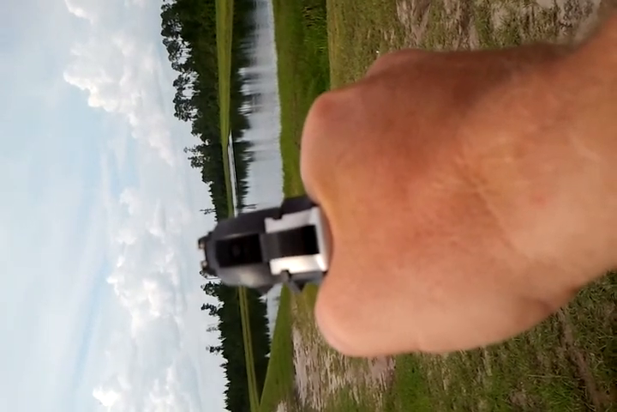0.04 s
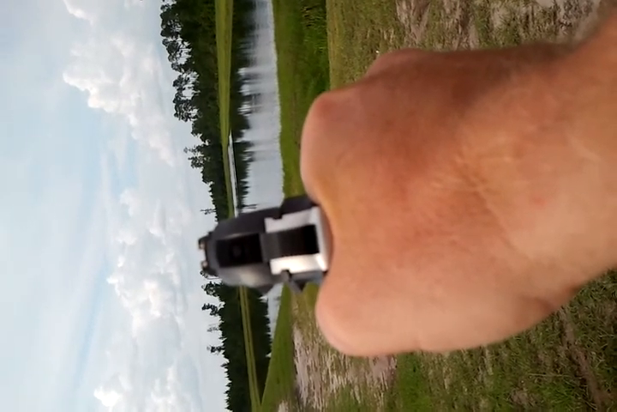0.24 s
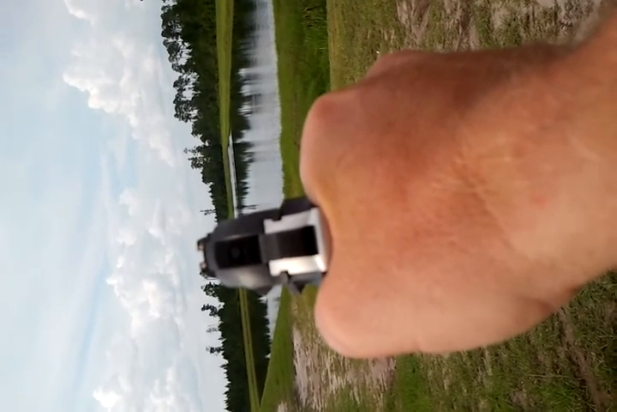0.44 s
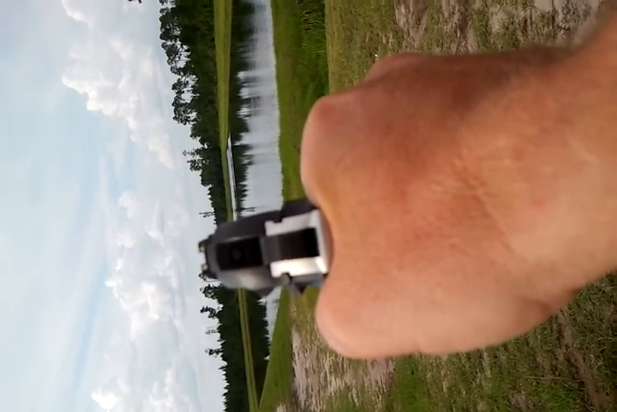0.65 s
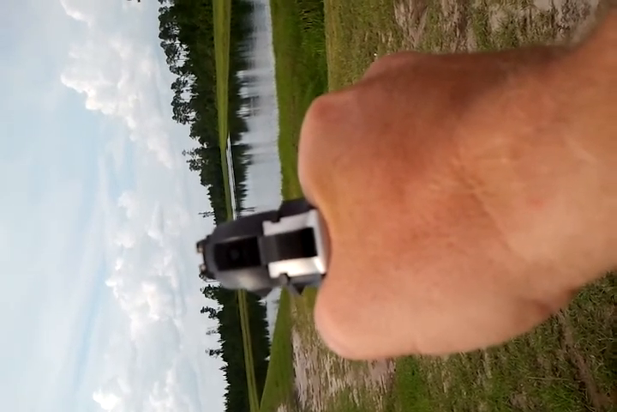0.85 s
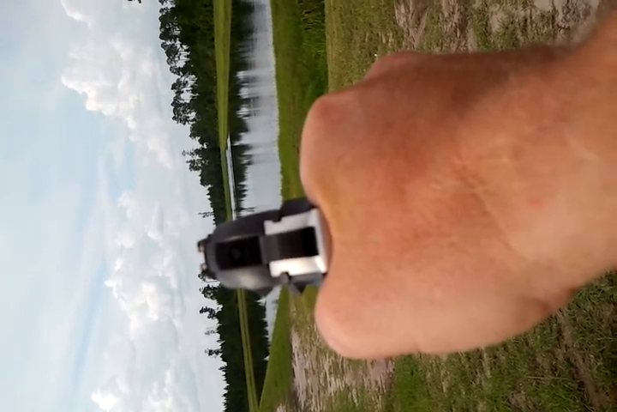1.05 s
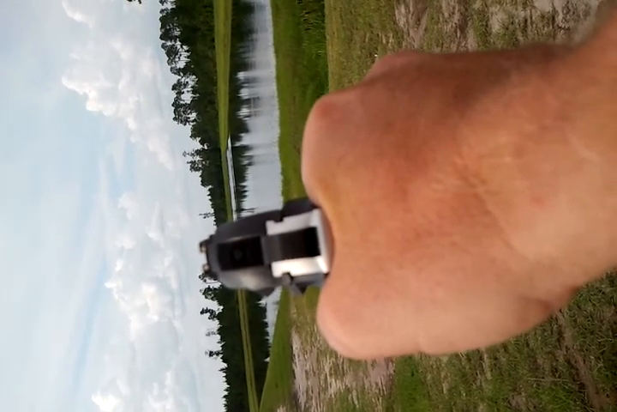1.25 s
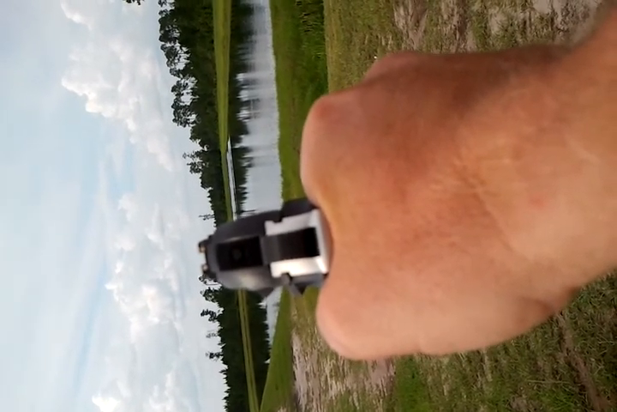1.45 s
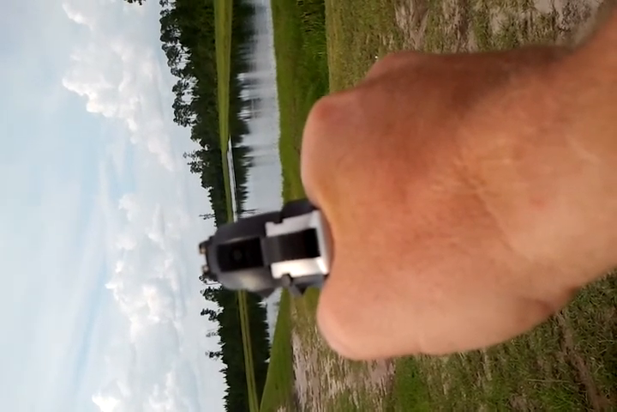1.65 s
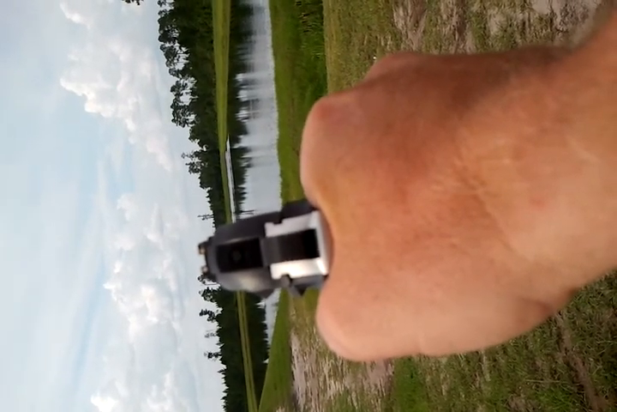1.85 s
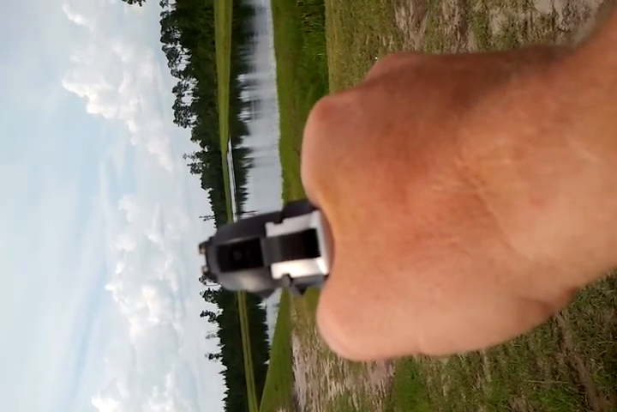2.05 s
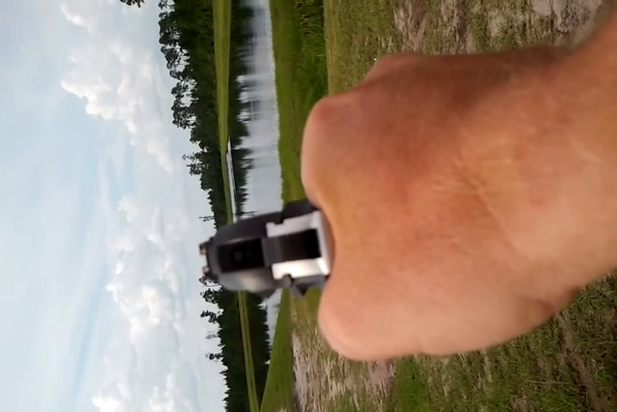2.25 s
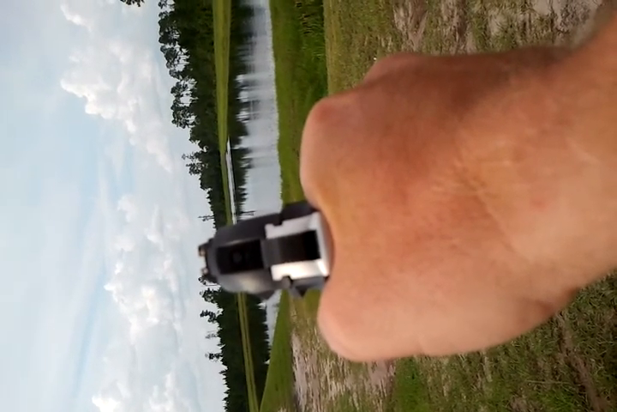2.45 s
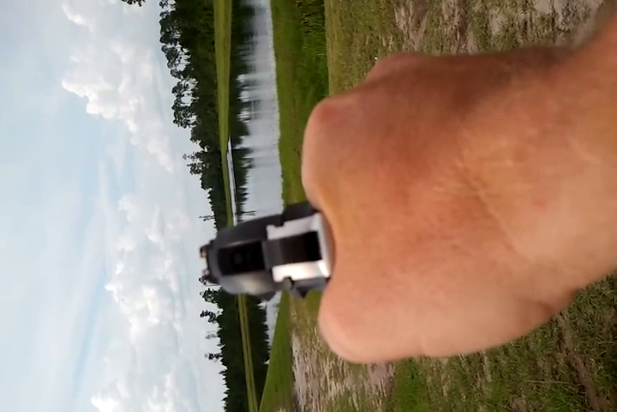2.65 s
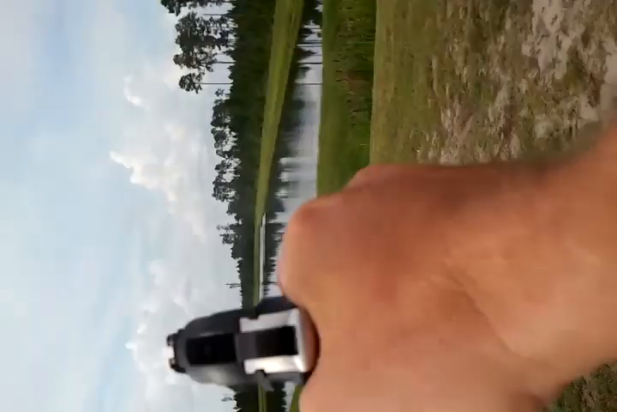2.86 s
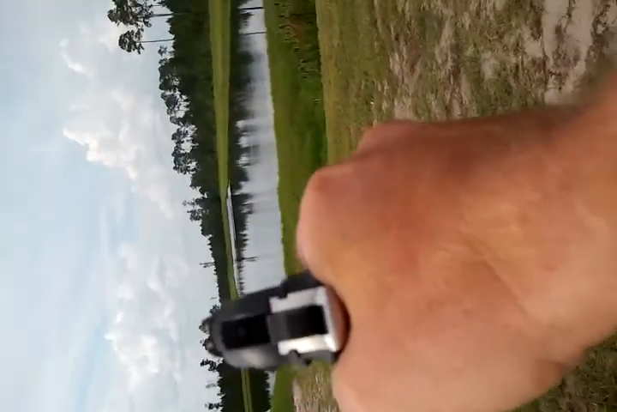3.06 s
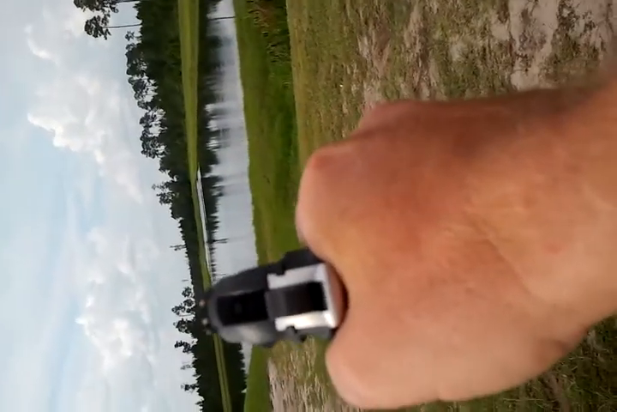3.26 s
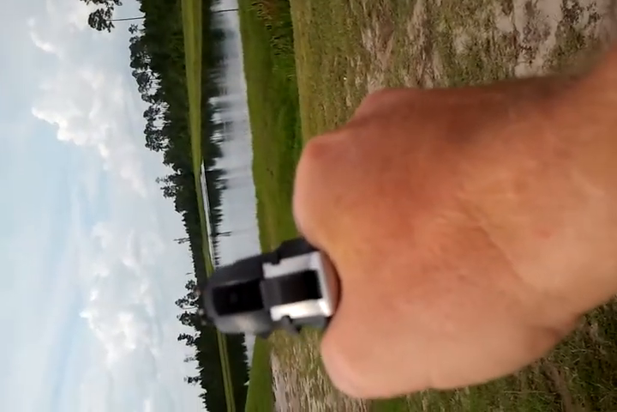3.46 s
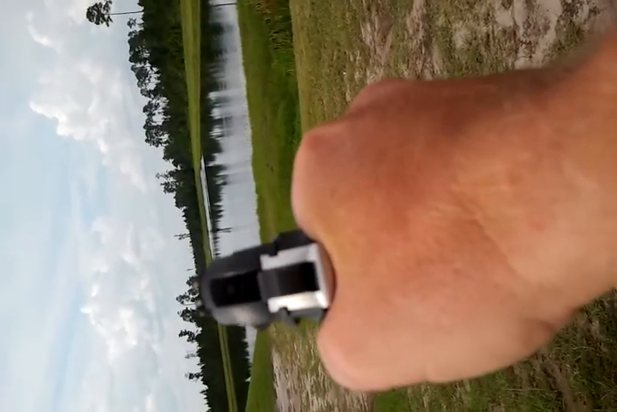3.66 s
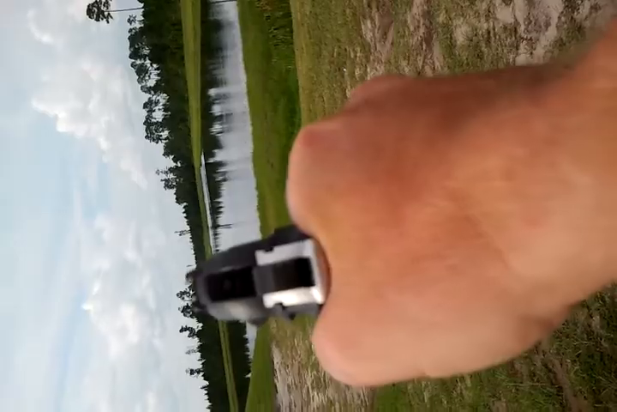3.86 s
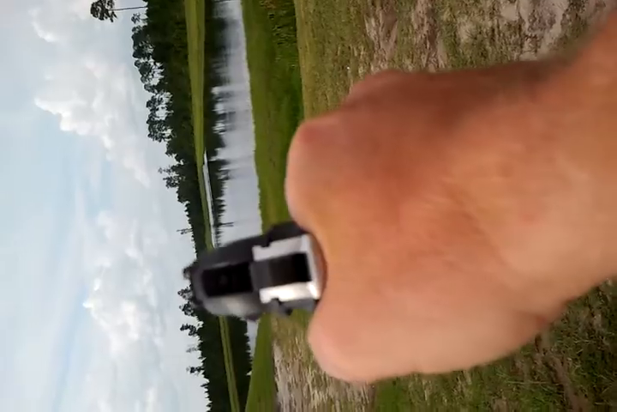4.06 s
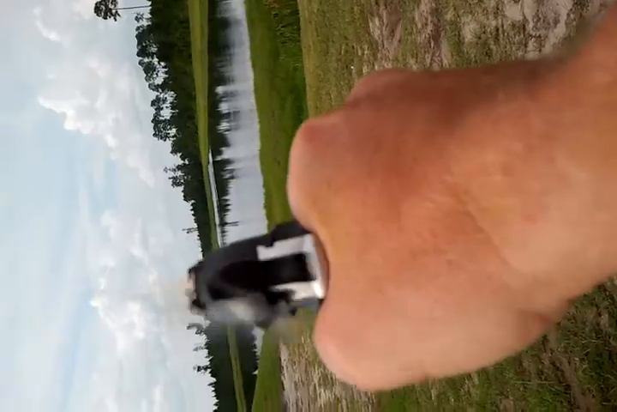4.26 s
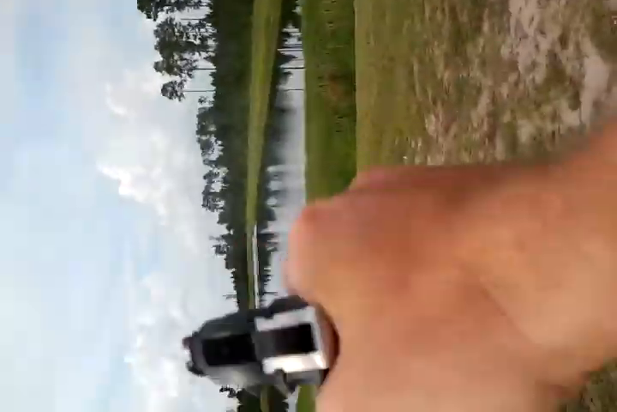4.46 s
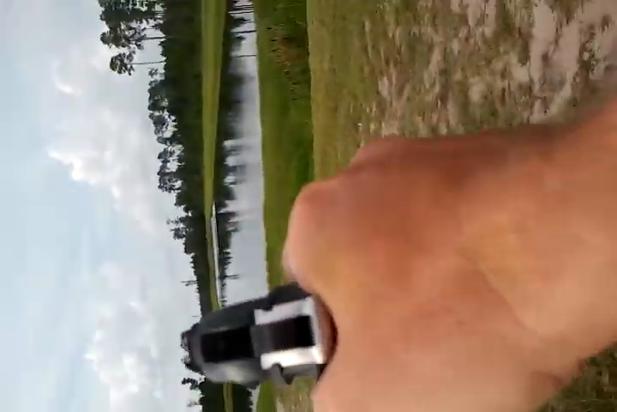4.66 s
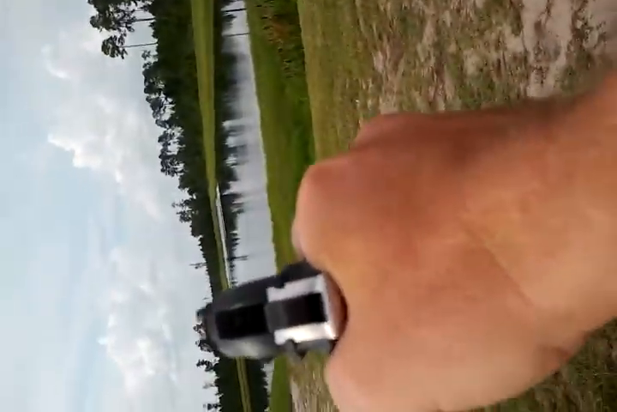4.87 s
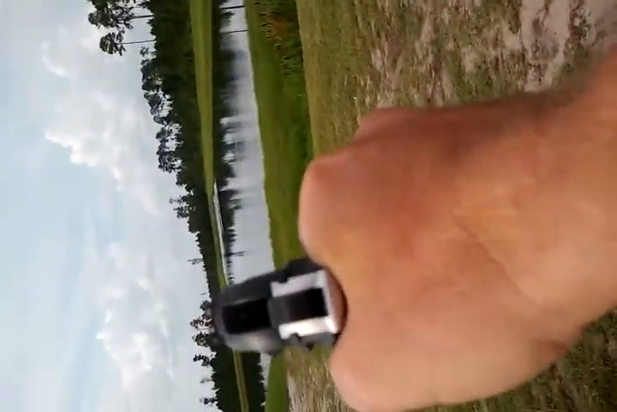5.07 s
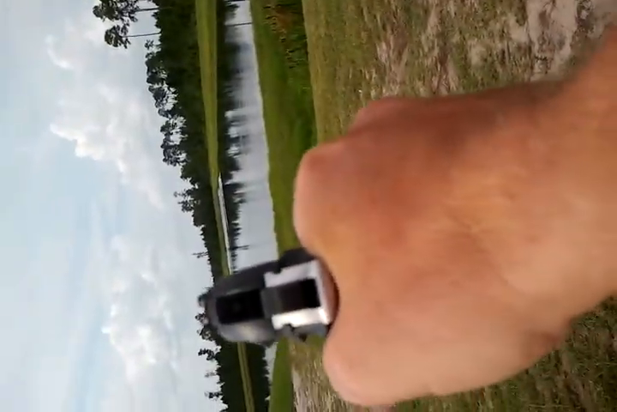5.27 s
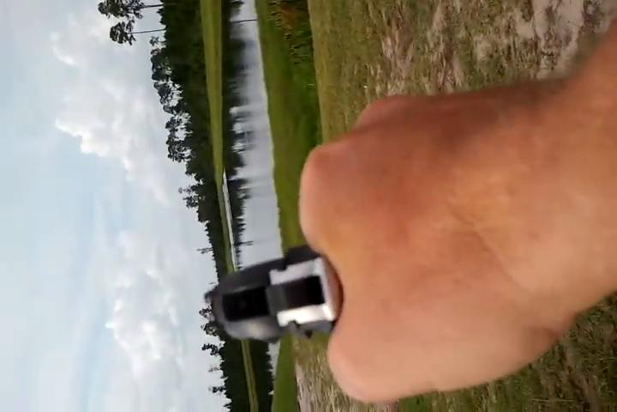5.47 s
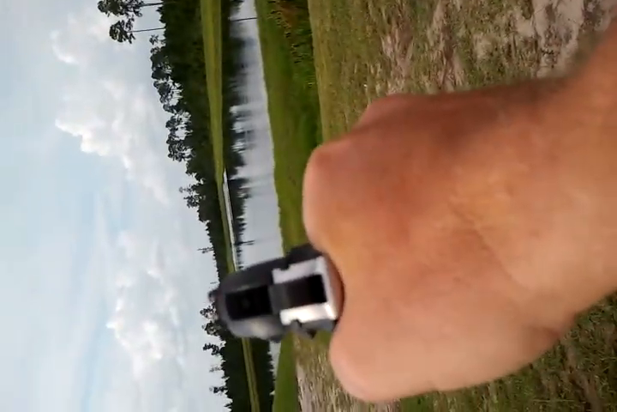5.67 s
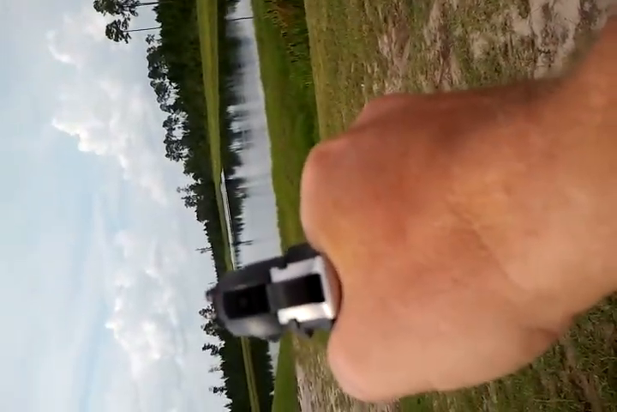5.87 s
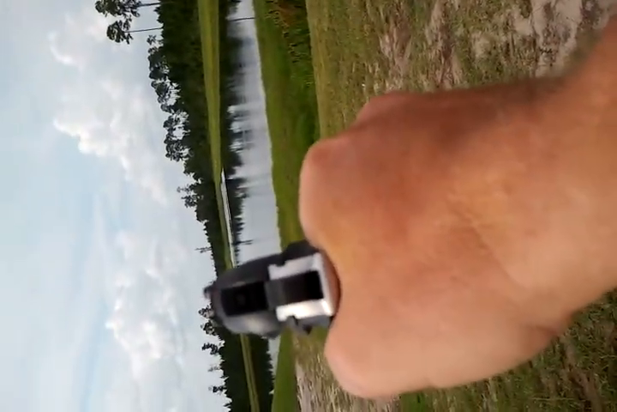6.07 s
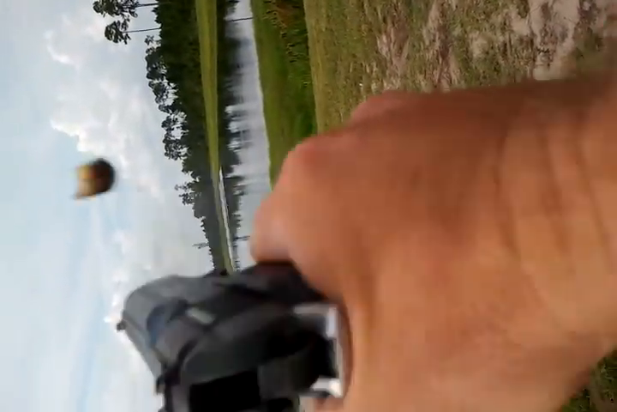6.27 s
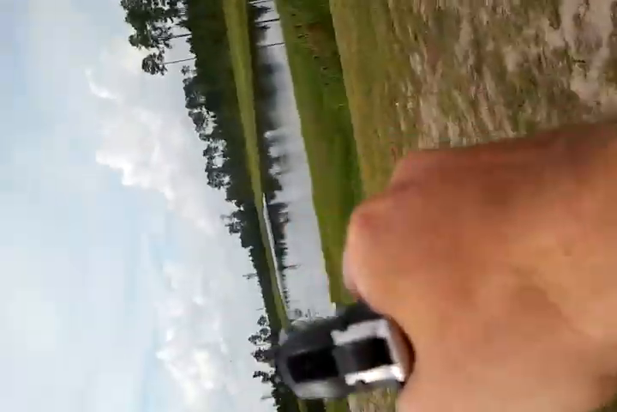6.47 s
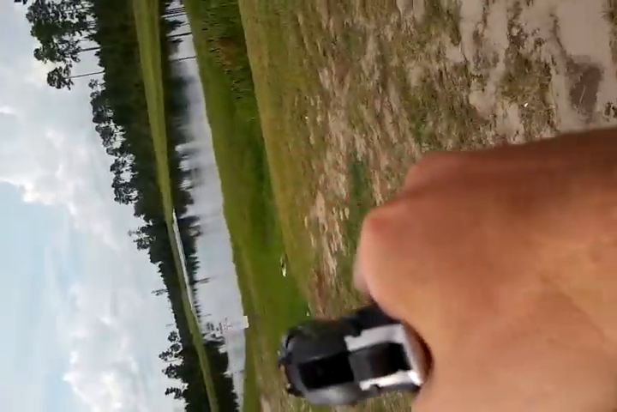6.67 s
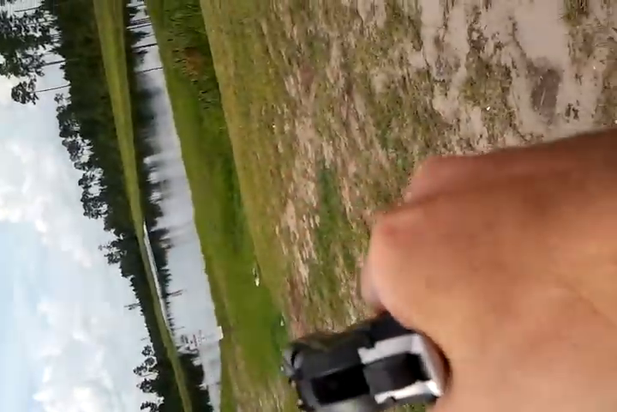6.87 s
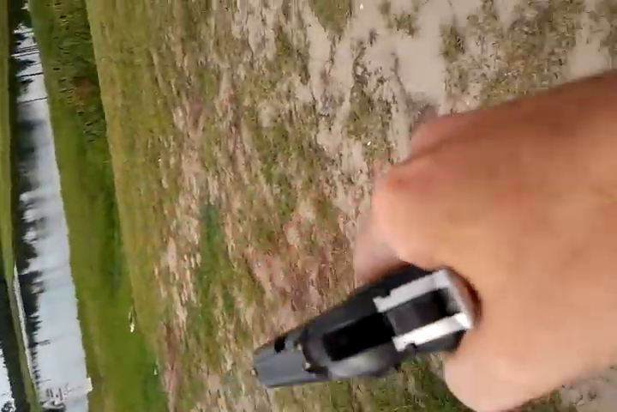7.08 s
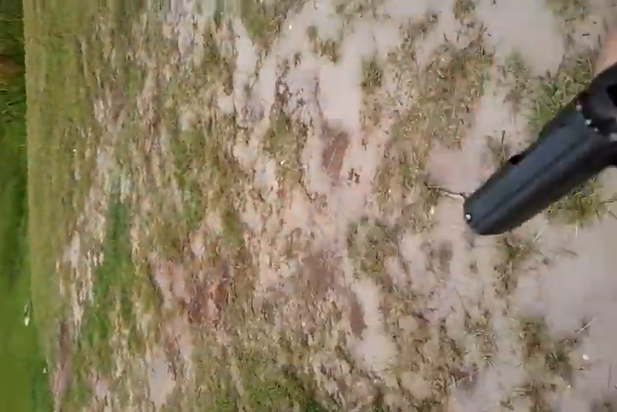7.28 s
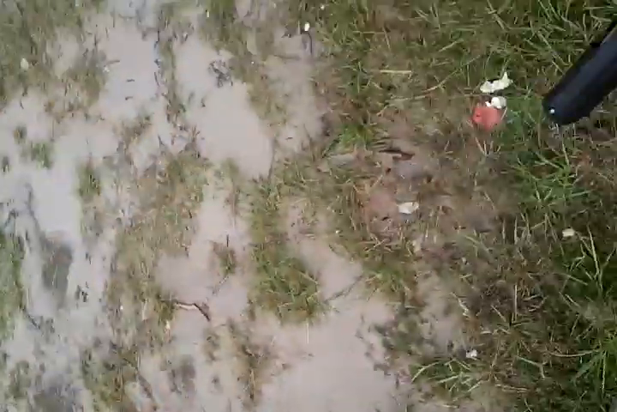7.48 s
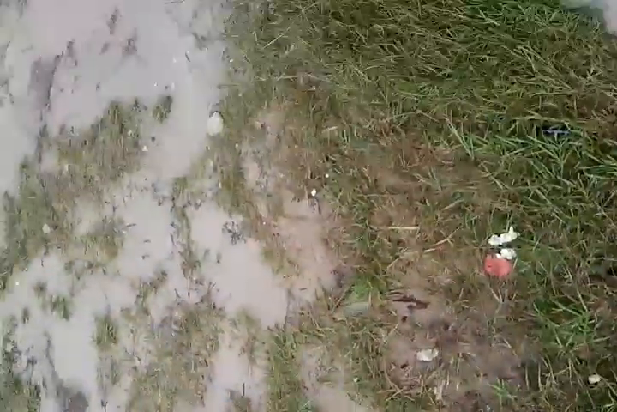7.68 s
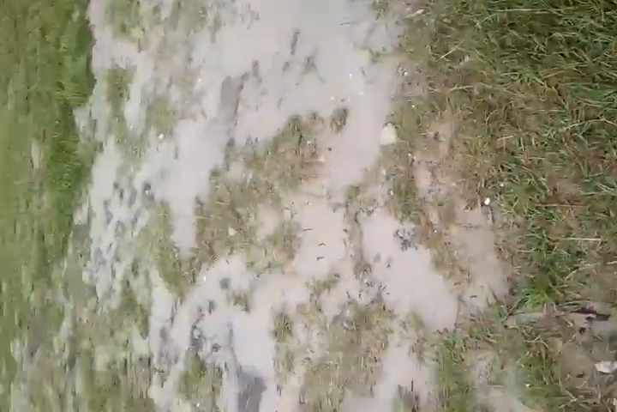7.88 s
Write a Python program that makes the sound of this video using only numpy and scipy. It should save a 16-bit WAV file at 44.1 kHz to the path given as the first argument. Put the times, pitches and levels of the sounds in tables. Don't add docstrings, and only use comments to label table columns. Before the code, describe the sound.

Open grassy field by water, phone microphone at arm's length from a pistol. Soft wind and faint hum come first, then three very loud, distorted shots a second or two apart. The first is followed by a bullet smacking water. Each echoes long off the trees while empty cases click down and fingers bump the phone; finally cloth rustles.

```python
import sys
import numpy as np
from scipy import signal
from scipy.fft import rfft, irfft, next_fast_len
from scipy.io import wavfile
from scipy.ndimage import uniform_filter1d

SR = 44100
rng = np.random.default_rng(int(sys.argv[2]) if len(sys.argv) > 2 else 0)


def undo_db(level):
    steps = np.asarray(level, float) / 20
    return 10 ** steps


def store_wav(level_fs):
    pcm = np.round(np.clip(np.atleast_2d(level_fs), -1, 1) * 32767)
    wavfile.write(sys.argv[1], SR, pcm.T.astype(np.int16))


N = 350008
T = np.arange(N) / SR

# (blast [s], capsule pinned from [s], slide slams [s], capsule free again [s])
SHOTS = [
    (2.8775, 2.897, 2.9155, 2.932),
    (4.4130, 4.432, 4.446, 4.4625),
    (6.3855, 6.404, 6.4232, 6.434),
]
# (blast [dB], slide [dB], ground boom [dB])
SHOT_LEVELS = [(11, 10, -9.5), (11, 11, -10), (11, 4.5, -10)]
# (centre [Hz], width [Hz], level [dB])
BLAST_RINGS = [(515, 550, 11), (1833, 870, 10.5), (3810, 980, 4.5), (6700, 330, 4)]

# (time [s], treble [dB])
ECHO_STARTS = [(2.8776, 5), (4.4116, 3.5), (6.3844, 4)]
# (from [Hz], to [Hz], grain share [0-1], share that repeats from shot to shot [0-1])
ECHO_BANDS = [(60, 500, .5, .6), (500, 1800, .9, .92), (1800, 2900, .45, .6), (2900, 5500, .12, .25),
              (5500, 8300, .05, .05)]
# (level [dB], t60 [s])
GROUND = [(-18, 0.99), (-14, 0.58), (-14.5, 0.16), (-25, 0.24), (-19, 0.19)]
# (arrival after the shot [s], build-up [s], level [dB], t60 [s])
TREES = [(.11, 0.0067, -25, 0.67), (0.167, 0.005, -14.5, 1.436), (0.12, 0.013, -19.5, 1.24),
         (0.096, 0.01, -27, 1.135), (0.093, 0.035, -12.5, 0.59)]
# (level [dB], t60 [s])
FAR_WOODS = [(-51, 1), (-27.5, 4.9), (-32.5, 4.94), (-45.5, 5), (-43, 3.2)]
# (time after the shot [s], level over the crowd [dB])
BIG_RETURNS = [(0.0554, 8.0), (0.0604, 9.5), (0.0658, 9.1), (0.079, 8.6), (0.1045, 8.7), (0.1158, 8.1),
               (0.1205, 7.7), (0.1358, 7.2), (0.1448, 7.2), (0.1762, 7.5), (0.1838, 8.4), (0.1972, 9.7),
               (0.2045, 9.8), (0.2139, 7.8), (0.2345, 8.2), (0.2473, 10.1), (0.2754, 10.6), (0.2811, 9.4),
               (0.2897, 8.9), (0.2959, 10.6), (0.3239, 9.5), (0.3305, 11.3), (0.3565, 12.0), (0.3835, 12.2),
               (0.4036, 9.1), (0.4328, 10.4), (0.4672, 10.3), (0.4917, 9.2), (0.5299, 10.5), (0.6496, 10.8)]
# (frequency [Hz], level per Hz [dB])
ECHO_COLOUR = [(120, -33), (200, -11.5), (290, -15), (436, -13.5), (650, -1.5), (850, 1), (1200, 1),
               (1500, -4.5), (1900, -18), (2600, -22.5), (2950, -31.5), (3800, -26), (5300, -35.5),
               (6600, -24)]

# (time [s], peak [dB], dull part [dB], bright part [dB], t60 [s])
CASE_CRACKS = [(3.5773, 10, -7, 2.5, 0.014), (3.5796, -1, -1.5, -1, 0.09), (3.653, -14.5, -8, -11, 0.05),
               (3.6712, -19, -4, -17, .045), (4.8359, 8, -6, -2, 0.05), (4.843, -10.5, 1.5, -14, 0.14),
               (5.0604, -27, -8, -33, 0.016), (5.3807, 3, -18.5, -10.5, 0.066),
               (5.3914, -21, -5, -15, 0.13), (5.6582, -19, -11, -9, 0.066), (5.7694, -27, -9, -20, 0.055),
               (5.8396, -27.5, -14, -12, 0.058), (7.0128, -23.5, 8, -25, 0.022),
               (7.0344, -30, -11, -12, 0.049), (7.0785, 3.5, -4, -25.5, 0.039), (7.0848, -7, -6, -12, 0.11),
               (7.278, -3.5, -11, -6, 0.06), (7.29, -10, -35, -18, 0.049), (7.3365, -20, -21, -19, 0.046),
               (7.368, -21.5, -25, -3, 0.065), (7.7903, -29, -14, -3, 0.046)]
# (time [s], peak [dB], dull part [dB], bright part [dB])
CASE_TICKS = [(5.1055, -25.5, 3, -23), (5.239, -2, -3.5, -27), (5.2809, -29.5, 13, -22),
              (6.2623, -28, -11, 1), (6.321, -24, 1.5, -20), (6.5086, 1, -12, 12), (6.8687, -1, 3.5, -6),
              (7.245, -16, -8, -3), (7.2548, -16, -5, -17), (7.342, -32, 0, 8), (7.385, -9.5, -37, -1.5),
              (7.5558, -13.5, -19, 3.5)]
# (centre [Hz], width [Hz], level [dB])
CASE_RINGS = [(2120, 55, 2.5), (3160, 1000, 3), (3770, 650, -2), (4930, 1300, -20)]

# (time [s],
# peak [dB], pitch [Hz])
THUMPS = [(1.3, -24, 291), (2.378, -26, 320), (3.011, -2.5, 298), (3.817, -24, 320), (4.051, -20, 204),
          (4.149, -20.5, 199), (4.197, -22, 226), (4.268, -25.5, 144), (4.479, -2, 277), (4.544, 6, 235),
          (4.597, -3.5, 133), (5.098, -9.5, 324), (5.112, -18, 160), (5.273, -17, 163), (5.39, -7, 383),
          (5.428, -18.5, 214), (5.46, -12.5, 345), (5.548, -14.5, 280), (5.993, -21, 186),
          (6.087, -34, 154), (6.259, -12, 304), (6.346, -33, 209), (6.357, -12, 226), (6.509, -6, 314),
          (7.276, -17, 155), (7.534, -15.5, 269), (7.609, -17, 289.6), (7.737, -23, 213),
          (7.812, -17.5, 330), (7.92, -14, 330)]
# (time [s], level [dB])
RUSTLE = [(7.0, -52), (7.3, -39), (7.45, -41), (7.6, -41), (7.79, -42.5), (7.937, -49.5)]

# (time [s], level [dB])
BREEZE = [(0, -44), (.4, -42), (.66, -46.5), (1.37, -39), (1.61, -45.5), (2.8, -41), (3.58, -35.5),
          (3.8, -42), (4.5, -31.5), (4.9, -39), (5.44, -32), (6.04, -40), (6.3, -30), (6.8, -40),
          (7.0, -43.5), (7.94, -37)]
# (frequency [Hz], level per Hz [dB])
BREEZE_COLOUR = [(12, -62), (20, -64), (58, -6.5), (151, 0.5), (182, 1.5), (259, -2.5), (307, -7),
                 (420, -10.5), (600, -13.5), (780, -55), (1320, -120)]
# (frequency [Hz], level per Hz [dB])
AIR_COLOUR = [(180, -30), (300, -1.5), (418, -10), (592, -17), (674, -8.5), (790, -14.5), (1100, -10.5),
              (1410, -17.5), (1700, -16), (3030, -28), (3660, -23.5), (4820, -32), (7220, -21),
              (8590, -38.5), (9500, -60), (12400, -102), (20900, -120)]
# (pitch [Hz], wander [Hz], level [dB])
HUM = [(313, 8.68, -50.5), (710, 10.3, -64.5), (1099, 6.5, -49.5), (1663, 13, -59)]


def unit(x):
    return x / np.sqrt(np.mean(x ** 2))


def noise():
    return rng.standard_normal(N)


def band(x, lo_hz, hi_hz, order=2):
    return signal.sosfilt(signal.butter(order, [lo_hz, hi_hz], "band", fs=SR, output="sos"), x)


def ring(x, hz, width_hz):
    return signal.lfilter(*signal.iirpeak(hz, hz / width_hz, SR), x)


def rings(table):
    return unit(sum(undo_db(db) * unit(ring(noise(), hz, width_hz)) for hz, width_hz, db in table))


def colour(x, table):
    hz, db = np.transpose(table)
    size = next_fast_len(N, real=True)
    f = np.arange(size // 2 + 1) * SR / size + 1
    gain = undo_db(np.interp(np.log(f), np.log(hz), db, left=-60, right=-60))
    return unit(irfft(rfft(x, size) * gain, size)[:N])


def walk(rate):
    k = int(SR / rate)
    steps = np.repeat(rng.standard_normal(N // k + 1), k)[:N]
    return unit(uniform_filter1d(steps, k))


def add(out, sound, db, start, t60, rise=0.00011, stop=None):
    end = stop or start + 1.5 * t60
    span = slice(int(start * SR), int(end * SR))
    t = T[span] - T[span.start]
    out[span] += sound[span] * (1 - np.exp(-t / rise)) * undo_db(db - 60 * t / t60)


def pistol():
    gas = rings(BLAST_RINGS)
    steel = unit(band(noise(), 5560, 7830))
    clack = unit(ring(noise(), 1490, 430))
    snap = unit(band(noise(), 6400, 7300))
    boom = unit(band(noise(), 490, 730))
    barrel = np.sin(2 * np.pi * 1900 * T + 0.3 * walk(150))
    spits = (rng.random(N) < 900 / SR) * rng.exponential(size=N)
    spits = uniform_filter1d(spits, size=5) * 5
    out = np.zeros(N)
    for (s, pinned, slide, free), (blast_db, slide_db, boom_db) in zip(SHOTS, SHOT_LEVELS):
        add(out, steel + 0.64 * clack, -19, s - .005, .05, rise=0.0005)
        add(out, steel, blast_db - 4.5, s - .001, .03, rise=0.0071)
        add(out, gas, blast_db, s + 0.00041, .4, rise=0.016, stop=free)
        add(out, barrel, blast_db - 1, s + .008, .2, rise=.002, stop=s + .015)
        add(out, snap, slide_db, slide, .025, rise=.0008)
        add(out, clack, slide_db - 6, slide + .003, .08, rise=.001, stop=slide + .0095)
        add(out, boom, boom_db, free, .3, rise=0.0042)
        swing = np.clip((T - pinned) / .003, 0, 1) * np.clip((free - T) / .002, 0, 1)
        swing *= (T < slide) | (T > slide + .009)
        out -= undo_db(19) * swing * (1 - np.minimum(2.2 * spits, 1.03))
    return out


def landscape(big=()):
    sizes = undo_db(3.0 * np.minimum(rng.exponential(size=N), 3.5))
    hits = rng.random(N) < 400 / SR
    trunks = unit(hits * sizes * rng.choice([-1, 1], N))
    for lag, db in big:
        trunks[int(lag * SR)] = undo_db(db + 18)
    shape = ECHO_COLOUR + [(8000, -32.5), (9000, -52.5)]
    return colour(trunks, shape), colour(noise(), shape)


def tree_echo():
    echo_s, ground_lag_s = 3.2, .052
    span = int(echo_s * SR)
    still, stirred = landscape(BIG_RETURNS), landscape()
    near = np.exp(-(T / .7) ** 2)
    steady = np.ones(N)
    returns = np.ones(N)
    for lag, db in BIG_RETURNS:
        add(returns, steady, db - 14.5, lag, 0.039)
    out = np.zeros(N + span)
    for k, (lo_hz, hi_hz, share, same) in enumerate(ECHO_BANDS):
        ground_db, ground_t60 = GROUND[k]
        trees_lag, trees_rise, trees_db, trees_t60 = TREES[k]
        far_db, far_t60 = FAR_WOODS[k]
        env = np.zeros(N)
        add(env, steady, ground_db, ground_lag_s, ground_t60, rise=0.0012)
        add(env, steady, trees_db, trees_lag, trees_t60, rise=trees_rise)
        add(env, steady, far_db, trees_lag, far_t60, rise=0.11, stop=echo_s)
        env *= returns ** (1 - 0.079 * k)
        parts = [unit(band(x, lo_hz, hi_hz, order=3)) for x in still + stirred]
        for s, treble_db in ECHO_STARTS:
            i = int(s * SR)
            grain, hiss = (np.sqrt(same) * parts[j] + np.sqrt(1 - same) * np.roll(parts[j + 2], -i)
                           for j in range(2))
            sound = np.sqrt(share * near) * grain + np.sqrt(1 - share * near) * hiss
            out[i:i + span] += (sound * env)[:span] * undo_db(treble_db * k / 4)
    return out[:N]


def splash():
    strike_s = 3.032
    out = np.zeros(N)
    add(out, unit(band(noise(), 1000, 5500)), 3, strike_s, 0.085, rise=.002)
    add(out, unit(ring(noise(), 6740, 900)), -10, strike_s, 0.65, rise=0.017)
    return out


def cases():
    low = unit(band(noise(), 250, 640))
    dull = unit(band(noise(), 1000, 1800))
    bright = unit(band(noise(), 5500, 7470))
    edge = unit(band(noise(), 1200, 6900))
    brass = rings(CASE_RINGS)
    out = np.zeros(N)
    rows = [row + (-21.5,) for row in CASE_CRACKS]
    rows += [row + (0.017, -19) for row in CASE_TICKS]
    for s, db, dull_db, bright_db, t60, low_db in rows:
        touch = s - .0007
        add(out, edge, db - 15, touch, .008, rise=.0001)
        add(out, brass, db - 7, touch, .5 * t60, rise=0.00059)
        add(out, bright, db + bright_db, touch, 0.32 * t60, rise=0.00052)
        add(out, dull, db + dull_db, touch, 0.78 * t60, rise=0.00017)
        add(out, low, db + low_db, s, 2.64 * t60, rise=0.0011)
    return out * undo_db(-1.0)


def hand():
    cloth = unit(band(noise(), 2150, 2760)) + undo_db(-7) * unit(band(noise(), 3000, 8000))
    out = cloth * undo_db(np.interp(T, *np.transpose(RUSTLE), left=-120) + 1.5 * walk(17))
    add(out, unit(ring(noise(), 287, 8.7)), -28, 2.98, 2.5, rise=.03)
    fidget_per_s, fidget_db, thump_cycles = 3, -37, 4.43
    chance = rng.random((int(fidget_per_s * N / SR), 3))
    fidget = [(when * (N / SR - .1), fidget_db + 6 * size, 200 + 140 * pitch) for when, size, pitch in chance]
    for s, db, hz in THUMPS + fidget:
        knock = np.sin(2 * np.pi * hz * (T - s))
        add(out, knock, db + 10.5, s + 0.0019, thump_cycles / hz, rise=.003)
    return out


def field():
    puffs_db = np.interp(T, *np.transpose(BREEZE)) + 0.75 * walk(14)
    wind = colour(noise(), BREEZE_COLOUR) * undo_db(puffs_db)
    air = colour(noise(), AIR_COLOUR) * undo_db(-41.5 + .5 * walk(4.21))
    hum = np.zeros(N)
    for hz, wander_hz, db in HUM:
        level = undo_db(db + 2.3 * walk(17))
        phase = 2 * np.pi * np.cumsum(hz + wander_hz * walk(30)) / SR
        hum += level * np.sin(phase)
    return wind + air + hum


def scene():
    return (pistol() + tree_echo() + splash() + cases() + hand() + field())[None]


def band_limit(x):
    return signal.sosfilt(signal.butter(12, 16970, fs=SR, output="sos"), x)


def record(dry):
    rail, ceiling, top_hz = .56, 0.75, 8320
    railed = np.clip(dry, -rail, rail)
    excess = railed - dry
    railed = railed - .03 * excess
    offset = signal.sosfilt(signal.butter(1, 250, fs=SR, output="sos"), railed)
    pinned = uniform_filter1d((np.abs(excess) > 0) * 1., size=900)
    pinned = np.clip(pinned * 4, 0, 1)
    x = railed - pinned * offset
    x = x - pinned * signal.sosfilt(signal.butter(1, 110, fs=SR, output="sos"), x)
    x = signal.sosfilt(signal.ellip(8, .3, 80, top_hz, fs=SR, output="sos"), x)
    x = np.clip(x, -ceiling, ceiling)
    x = signal.sosfilt(signal.ellip(6, .3, 50, 15800, fs=SR, output="sos"), x)
    return band_limit(x)


dry = scene()
out = record(dry)
store_wav(out)
```